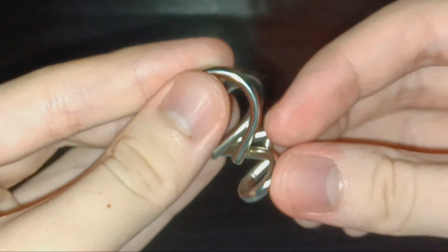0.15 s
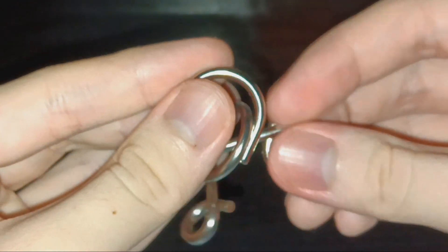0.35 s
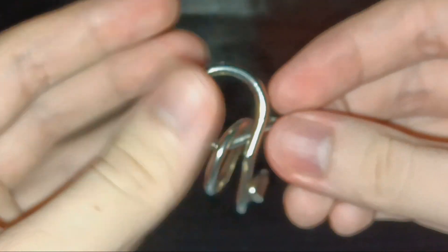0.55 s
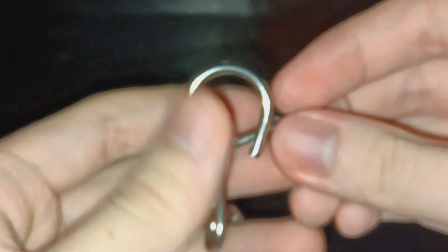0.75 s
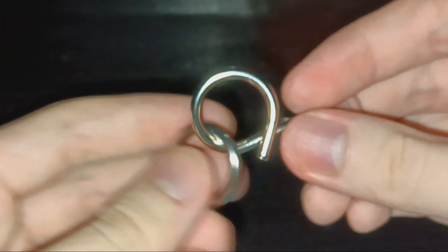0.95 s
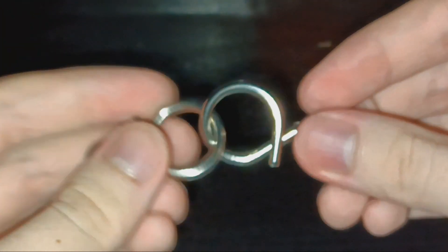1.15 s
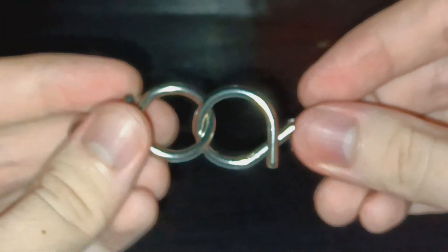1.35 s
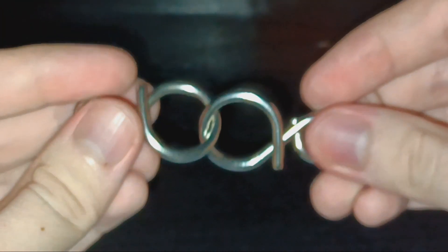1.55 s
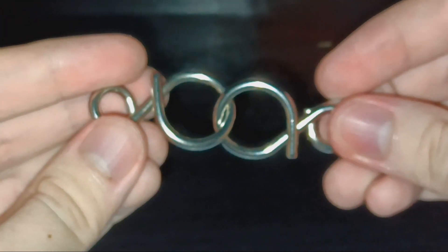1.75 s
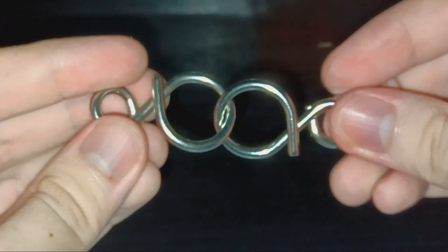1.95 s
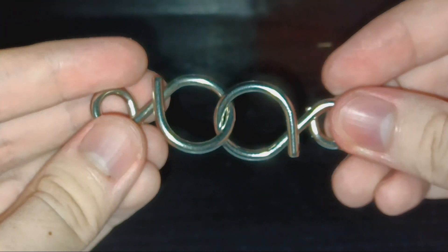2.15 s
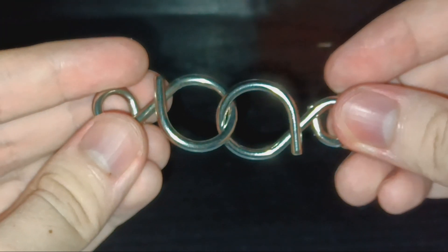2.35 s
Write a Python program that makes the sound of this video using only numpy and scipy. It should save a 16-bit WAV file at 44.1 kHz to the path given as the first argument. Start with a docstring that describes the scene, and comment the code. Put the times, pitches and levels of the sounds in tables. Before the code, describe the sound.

Metallic clinks from linked wire rings in a quiet room, nearer the right side: quick scrape and light ticks, a louder double clink with a shimmering high note, a final click, then near silence with low background noise.

```python
"""Wire ring puzzle, close up

A quiet room, two hands turning linked steel wire rings close to a microphone pair, nearer the right one.
The wires scrape as noisy slips and clink as damped clusters of modes; one ring drops, swings and sings
as a swelling sine until the fingers catch it with a last clink. Soft tones sound as links pull taut.
Behind lie a patchy wash of soft mid-band noise, a low hum and drone of drifting sines, and thin hiss."""
import sys
import numpy as np
from scipy import signal
from scipy.fft import rfft, irfft
from scipy.io import wavfile
from scipy.ndimage import uniform_filter1d

SR = 44100
rng = np.random.default_rng(int(sys.argv[2]) if len(sys.argv) > 2 else 0)


def generate_wav(signal):
    """Clip the signal to [-1, 1] and save it as 16-bit WAV at the path in sys.argv[1]."""
    frames = np.transpose(np.atleast_2d(signal))
    scaled = np.clip(frames, -1, 1) * 32767
    pcm = np.round(scaled).astype(np.int16)
    wavfile.write(sys.argv[1], SR, pcm)


N = 110250  # samples, 2.5 s
LEFT_LAG_S = 60 / 44100  # extra travel time to the left microphone
SILENT_DB = -200


def amp(db):
    """Decibels to gain."""
    return 10 ** (np.asarray(db) / 20)


def unit(x):
    """Scales to rms 1."""
    return x / np.sqrt(np.mean(abs(x) ** 2) + 1e-20)


def read(points, hz):
    """A spectrum's value at hz, interpolated along log frequency."""
    f, value = np.transpose(points)
    return np.interp(np.log(hz + 1), np.log(f), value)


def level(points, outside=None):
    """Gain over time from rows of (t/s, level/dB); outside is the level before and after them."""
    s, db = np.transpose(points)
    return amp(np.interp(np.arange(N) / SR, s, db, outside, outside))


def add(mix, s, sound):
    """Mixes a sound in at time s."""
    part = mix[round(s * SR):][:len(sound)]
    part += sound[:len(part)]


def colour(x, points):
    """Filters causally (minimum phase) to the given spectrum in dB."""
    log_gain = np.log(amp(read(points, abs(np.fft.fftfreq(4096, 1 / SR)))))
    taps = np.fft.ifft(np.exp(np.conj(signal.hilbert(log_gain)))).real[:2048]
    return signal.oaconvolve(x, taps)[:len(x)]


def drift(hz):
    """Slow random motion of rms 1: noise kept below about hz."""
    f = np.fft.rfftfreq(N, 1 / SR)
    return unit(irfft(rfft(rng.standard_normal(N)) * np.exp(-(f / hz) ** 2), N))


def late(x):
    """Delays sound by the extra travel time to the left microphone."""
    return np.pad(x, (round(LEFT_LAG_S * SR), 0))[:N]


PATCHY_DB = 1.9  # rms depth of the patches
WASH_SHARED = 0.18  # gain of the right wash added into the left


def wash(shape, curve, db):
    """Soft noise that swells and sinks in patches of time and frequency."""
    hz = np.fft.rfftfreq(2048, 1 / SR)
    real, imag, patches = rng.standard_normal((3, 2, len(hz), N // 512 + 4))
    patches = uniform_filter1d(patches.sum(0), size=7, axis=0)
    patches = unit(uniform_filter1d(patches, size=7, axis=1))
    spectrum = (real + 1j * imag) * amp(read(shape, hz)[:, None] + PATCHY_DB * patches)
    left, right = signal.istft(spectrum, nperseg=2048, noverlap=1536)[1][:, :N]
    pair = np.array([unit(left + WASH_SHARED * late(right)), unit(right)])
    return amp(db) * pair * level(curve)


# spectra of the two wash bands: f/Hz, relative level/dB
LOW_WASH_SPECTRUM = [(25, -19), (100, -0.5), (160, -16.5), (420, -12.5), (600, -4.5), (780, 2), (880, 5),
                     (980, 1), (1150, -3.5), (1400, -26), (4000, -54)]
HIGH_WASH_SPECTRUM = [(700, -39.5), (1050, -6), (1450, 2.5), (1900, 0.5), (2130, -10.5), (3500, -20),
                      (6000, -58), (16000, -75)]
# swell of the wash: t/s, low band relative level/dB, high band relative level/dB
WASH_SWELL = [(0.0, -66, -60.5), (0.02, -63, -57.5), (0.14, -66, -64.5), (0.26, -59, -60),
              (0.28, -68, -56.5), (0.33, -58, -55.5), (0.47, -64, -60), (0.65, -58.5, -56.5),
              (0.67, -64.5, -54.5), (0.86, -58.5, -58), (1.02, -56.5, -53), (1.12, -61.5, -58.5),
              (1.27, -53, -56), (1.56, -64.5, -55), (1.61, -58, -60), (1.66, -68.5, -60),
              (1.69, -56, -56.5), (1.94, -59.5, -55), (2.01, -67.5, -60.5), (2.13, -58.5, -59),
              (2.19, -65, -60), (2.5, -56.5, -57)]
LOW_WASH_DB, HIGH_WASH_DB, HIGH_WASH_LEFT_DB = 2.5, 3.5, -1  # gains on the swell, and left minus right


def background_wash():
    """Soft mid-band noise in two bands, each with its own swell."""
    s, low_db, high_db = np.transpose(WASH_SWELL)
    low = wash(LOW_WASH_SPECTRUM, np.c_[s, low_db], LOW_WASH_DB)
    high = wash(HIGH_WASH_SPECTRUM, np.c_[s, high_db], HIGH_WASH_DB)
    return low + high * amp([[HIGH_WASH_LEFT_DB], [0]])


# hiss spectrum of each microphone: f/Hz, relative level/dB
HISS_LEFT = [(100, -1.5), (6300, -16), (6800, -6), (7300, 3.5), (7850, -9), (8600, -1), (9400, -17),
             (11000, -38), (13000, -35), (15200, -39), (16200, -70)]
HISS_RIGHT = [(100, -1.5), (6600, -16.5), (7300, -12), (7900, -14), (8800, -19.5), (9700, -3), (10500, -1),
              (11500, -21), (13000, -33), (15200, -36), (16200, -71)]
# middle level of the hiss about which it wavers: left level/dB, right level/dB
HISS_DB = (-59.5, -60.5)
HISS_WAVER_DB, HISS_WAVER_HZ = 2.82, 7.3


def hiss():
    """Thin, slightly wavering noise, coloured by each microphone's own resonances."""
    sides = []
    for db, shape in zip(HISS_DB, (HISS_LEFT, HISS_RIGHT)):
        waver = amp(db + HISS_WAVER_DB * drift(HISS_WAVER_HZ))
        sides.append(waver * unit(colour(rng.standard_normal(N), shape)))
    return np.array(sides)


HUM_WAVER = 0.2  # rms share of the strength


def wavering_tones(tones, curve):
    """Sines whose pitch and strength drift at random, the wider ones faster."""
    out = np.zeros((2, N))
    for hz, width_hz, db, pan_db in tones:
        turns = np.cumsum(hz + width_hz / 2 * drift(width_hz)) / SR
        sine = np.sqrt(2) * amp(db) * np.sin(2 * np.pi * turns)
        tone = sine * (1 + HUM_WAVER * drift(2 * width_hz)) * level(curve)
        out += [amp(pan_db / 2) * late(tone), amp(-pan_db / 2) * tone]
    return out


# tones of the low hum, the drone above it and a faint whine:
# f/Hz, width/Hz, level over the curve/dB, left minus right/dB
HUM = [(58.2, 3.4, 0.019, 5.2)]
DRONE = [(232.8, 15.8, 7.95, -3.5), (297.2, 31, 8.5, 1)]
WHINE = [(878, 20, -6.5, -2)]
# curves of hum and drone: t/s, relative level/dB
HUM_LEVEL = [(0, -70), (.1, -72), (.37, -101), (.7, -78), (.85, -70), (1.2, -67.5), (1.28, -54),
             (1.38, -67), (1.46, -59), (1.53, -49.5), (1.58, -68), (1.72, -60), (1.97, -53), (2.18, -60.5),
             (2.26, -67.5), (2.34, -60.5), (2.5, -57)]
DRONE_LEVEL = [(0, -89.5), (.24, -75), (.34, -79), (1.0, -83), (1.08, -78), (1.16, -81.5), (1.53, -77),
               (1.585, -62.5), (1.66, -82.5), (2.06, -80), (2.15, -69), (2.22, -82), (2.33, -74),
               (2.41, -63), (2.5, -55.5)]


def hum_drone_whine():
    """Wavering low tones, and a whine that follows the low wash's swell."""
    s, low_db, _ = np.transpose(WASH_SWELL)
    low_tones = wavering_tones(HUM, HUM_LEVEL) + wavering_tones(DRONE, DRONE_LEVEL)
    return low_tones + wavering_tones(WHINE, np.c_[s, low_db])


# faint tones as the links are pulled taut: t/s, length/s, f/Hz, peak level before the room/dB
PINGS = [(1.36, 0.045, 2900, -76), (1.42, 0.056, 3750, -70.5), (1.76, 0.061, 2873, -66)]


def pings():
    """Short sines that swell and fade under half a sine arch."""
    out = np.zeros(N)
    for s, length, hz, db in PINGS:
        t = np.arange(0, length, 1 / SR)
        add(out, s, amp(db) * np.sin(np.pi * t / length) * np.sin(2 * np.pi * hz * t))
    return out


# decay of the room's tail: f/Hz, t60/s
ROOM = [(2000, 0.26), (6500, 0.35), (10000, 0.56), (12600, 0.22), (15000, 0.26)]
EARLY_S, EARLY_PER_S = 0.0055, 4000  # decay time constant and mean rate of quick reflections


def room(x, tail_db):
    """Direct sound, quick reflections from hands and desk, and a short tail."""
    t = np.arange(SR // 2) / SR
    hz, when, noise = signal.stft(rng.standard_normal(len(t)), SR, nperseg=256)
    decay = amp(-60 * when / read(ROOM, hz)[:, None])
    tail = signal.istft(noise * decay, SR)[1][:len(t)]
    tail = tail * np.minimum(t / 0.003, 1)  # fades in over 3 ms
    hits = rng.random(len(t)) < EARLY_PER_S / SR
    early = rng.standard_normal(len(t)) * hits * np.exp(-t / EARLY_S)
    echo = amp(tail_db) * tail / np.linalg.norm(tail) + early / np.linalg.norm(early)
    return x + signal.fftconvolve(x, echo)[:N]


CONTACT_S = 0.00033  # rise time constant


def contact_rise(t):
    """Soft start while the metal surfaces meet."""
    return 1 - np.exp(-(t / CONTACT_S) ** 2)


def ringing(modes, t, count=5):
    """Each mode is a cluster of close partials that beat, placed and phased at random each call."""
    out = np.zeros(len(t))
    for hz, db, t60, spread_hz in modes:
        place, phase = rng.random((2, count, 1))
        partials = hz + spread_hz * (2 * (np.arange(count)[:, None] + place) / count - 1)
        cluster = np.sin(2 * np.pi * (partials * t + phase)).sum(0)
        out += amp(db - 60 * t / t60) * cluster
    return out / np.sqrt(count)


# modes of the bent wires, before finger damping, for scrape and clinks alike:
# f/Hz, relative level/dB, t60/s, spread of partials to each side/Hz
WIRE = [(6320, -17.5, 0.16, 108), (6600, -26.5, 0.17, 92), (7380, -26.5, 0.3, 97), (8400, -36, .3, 480),
        (9700, -40, 0.14, 250), (10455, -6.5, 0.22, 46), (10800, -21, 0.13, 300), (11300, -28, 0.073, 350),
        (12650, -13.5, 0.21, 90), (12700, -29, .12, 300), (14440, -20, 0.16, 200), (15200, -39, .07, 200)]
# wires sliding over each other: t/s, level of the direct slips/dB
SLIDE = [(.183, -71), (.188, -46), (.2, -43.5), (.215, -42), (.228, -48), (.238, -50), (.25, -78)]
# colour of the slips: f/Hz, relative level/dB
SCRAPE = [(2000, -15.5), (6000, -27), (8200, -15), (10200, 11.5), (11400, 6), (12000, 3), (12600, -11),
          (13600, -5), (14500, -2), (16500, -30)]
SLIPS_PER_S, SLIP_SPREAD_DB = 740, 8
SLIP_RING_DB, SLIP_DAMP_S = -13, 0.03  # ring against slips; t60 of the added damping


def scrape():
    """Tiny irregular slips of wire along wire, each setting the damped wires ringing."""
    slips = rng.random(N) < SLIPS_PER_S / SR
    slips = slips * amp(SLIP_SPREAD_DB * np.clip(rng.standard_normal(N), -2, 2))
    slips = colour(slips * rng.choice([-1, 1], N), SCRAPE)
    t = np.arange(SR // 10) / SR
    wire = ringing(WIRE, t) * amp(-60 * t / SLIP_DAMP_S) * contact_rise(t)
    ring = signal.fftconvolve(slips, wire)[:N]
    return (unit(slips) + amp(SLIP_RING_DB) * unit(ring)) * level(SLIDE, SILENT_DB)


# wire on wire: t/s, relative level/dB, extra level of low modes/dB, t60 of finger damping/s,
# extra level of top modes/dB, extra level of contact crack/dB
CLINKS = [(0.1876, -17, -3, 0.063, 4, -10), (.2022, -30, -21, .08, 14, -7), (.2091, -23, -30, .04, -8, -1),
          (.2148, -27.5, -23, .02, 0, 5), (.2410, -5.5, -1.5, 0.046, 5, -8),
          (.2921, -20, -14, 0.049, -9, -5), (0.3868, -19.5, -14, .029, 0, -6), (0.4101, -2, 10, 0.15, 3, 7),
          (0.4176, -0.5, 4.5, .1, 6, -3), (.4247, -10.5, 8, .1, 3, 2), (0.4276, -15, -5, .04, -2, 2),
          (.8654, -10.5, 4, 0.02, 12, 7), (0.867, -11, -10, 0.23, 3, -8)]
# colour of the contact crack: f/Hz, relative level/dB
CRACK = [(1000, -28), (5750, -37.5), (6300, -1), (7300, -2.5), (8200, -8), (10300, 0), (12600, -1.5),
         (13500, -17), (14400, 1), (15500, -13), (16500, -16)]
LOW_EDGE_HZ, TOP_EDGE_HZ = 9000, 12000  # low modes lie below, top modes above
WIRE_DB, CRACK_DB, CRACK_S = -18, -18.5, 0.0012  # base gains; crack decay time constant


def clinks():
    """Each contact cracks and rings the linked wires, nearly alike in pitch, which the fingers damp."""
    out = np.zeros(N)
    t = np.arange(SR // 4) / SR
    for s, db, low_db, damp_s, top_db, crack_db in CLINKS:
        modes = []
        for hz, mode_db, t60, spread_hz in WIRE:
            extra_db = low_db * (hz < LOW_EDGE_HZ) + top_db * (hz > TOP_EDGE_HZ)
            modes.append((hz, mode_db + extra_db, t60, spread_hz))
        ring = ringing(modes, t) * amp(-60 * t / damp_s) * contact_rise(t)
        crack = colour(rng.standard_normal(len(t)) * np.exp(-t / CRACK_S), CRACK)
        add(out, s, amp(db) * (amp(WIRE_DB) * ring + amp(CRACK_DB + crack_db) * crack))
    return out


# hanging ring's note, swelling and fading as it swings: t/s, relative level/dB, left minus right/dB
SWING = [(.411, -26, -15), (.44, -26, -15), (.475, -23, -20), (.505, -25, -9), (.527, -33.5, -10),
         (.555, -32, -22), (.6, -50, -6), (.632, -40, -15), (.662, -47, -11), (.69, -38, -10),
         (.775, -44, -22), (.81, -57, -18), (.86, -58, -18)]
# lower modes of the dropped ring: f/Hz, relative level/dB, t60/s
FREE = [(2460, -52, .11), (2560, -50, .08), (2624, -32, 0.076), (3640, -63.5, 0.37), (5140, -53, .2),
        (5114, -53, 0.34), (5290, -61, .12)]
SWING_HZ, SWING_DB = 10430, -3  # the note and its gain on the swing levels
FREE_RISE_S, FREE_LEFT_DB = 0.0031, -5.5  # rise time constant; left minus right


def swinging_ring():
    """The dropped ring's low modes knock and die; its high note, as it turns, beams at each microphone."""
    s, db, pan_db = np.transpose(SWING)
    t = np.maximum(np.arange(N) / SR - s[0], 0)
    swell = level(np.c_[s, db + SWING_DB], SILENT_DB)
    note = np.sqrt(2) * np.sin(2 * np.pi * SWING_HZ * t) * swell * contact_rise(t)
    knock = sum(amp(mode_db - 60 * t / t60) * np.sin(2 * np.pi * hz * t) for hz, mode_db, t60 in FREE)
    knock = knock * (1 - np.exp(-t / FREE_RISE_S))
    left = late(note * level(np.c_[s, pan_db]) + amp(FREE_LEFT_DB) * knock)
    return np.array([left, note + knock])


# colour of the puzzle at the farther, left microphone: f/Hz, left minus right/dB
LEFT = [(2600, -3.5), (5200, 4), (6400, -4), (7300, 2.5), (8500, 4), (10400, -17), (12600, -11.5),
        (14400, -6.5), (16000, -11)]
ROOM_LEFT_DB, ROOM_RIGHT_DB = -1.5, -5  # tail levels


def puzzle():
    """Metal heard through the room, later and coloured on the left, with the swinging ring."""
    metal = clinks() + scrape() + pings()
    left = late(colour(room(metal, ROOM_LEFT_DB), LEFT))
    right = room(metal, ROOM_RIGHT_DB)
    return np.array([left, right]) + swinging_ring()


def scene():
    """The puzzle, nearer the right microphone, over the soft background."""
    return background_wash() + hiss() + hum_drone_whine() + puzzle()


EDGE_HZ = 16200


def record(dry):
    """The recorder's band limit, a steep low-pass."""
    taps = signal.firwin(255, EDGE_HZ, window=("kaiser", 9), fs=SR)
    return signal.oaconvolve(dry, taps[None], "same", axes=1)


dry = scene()
out = record(dry)
generate_wav(out)
```